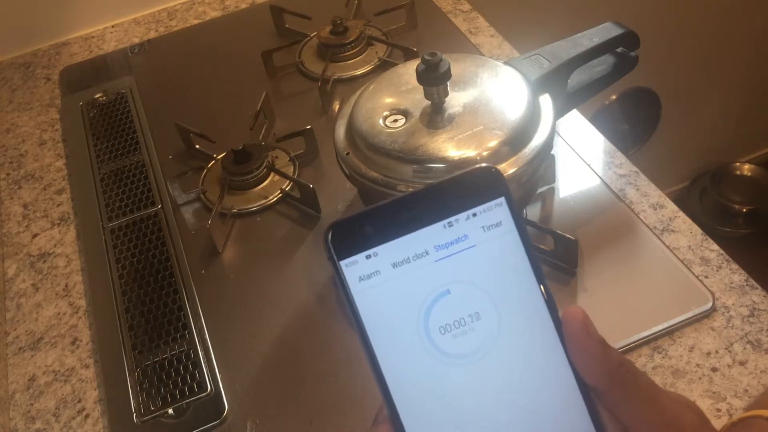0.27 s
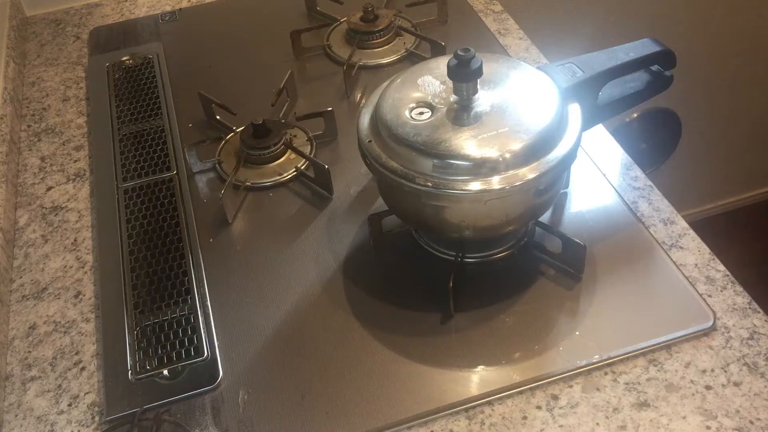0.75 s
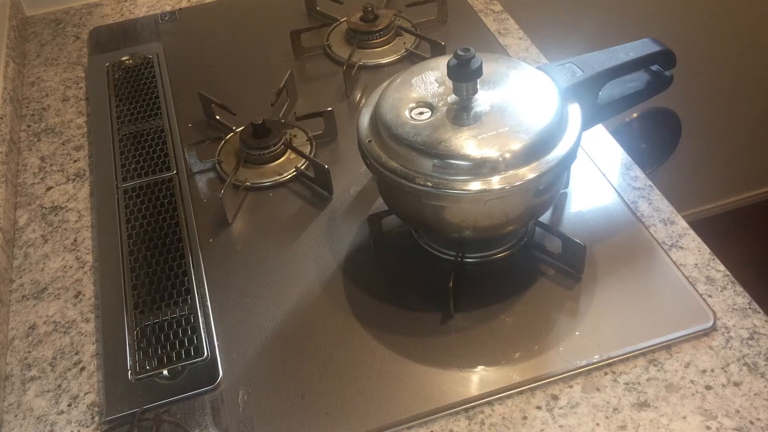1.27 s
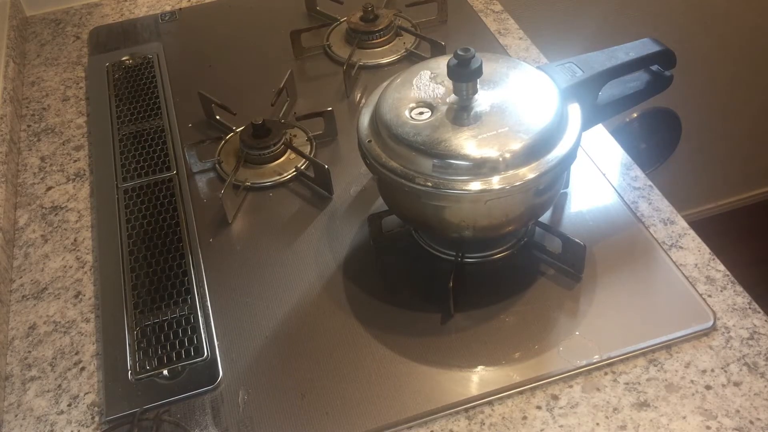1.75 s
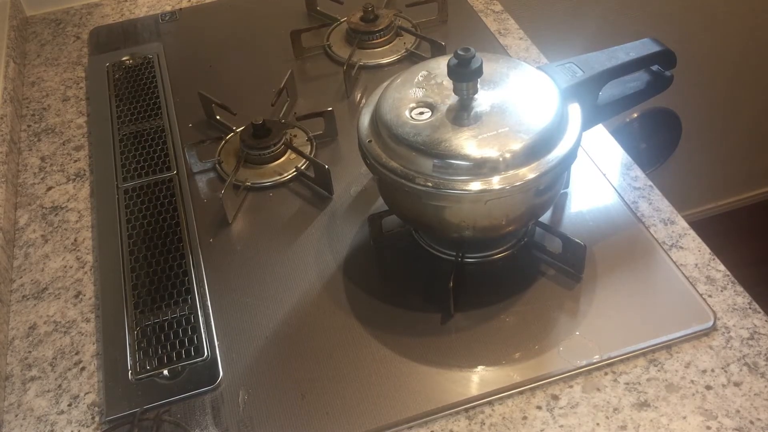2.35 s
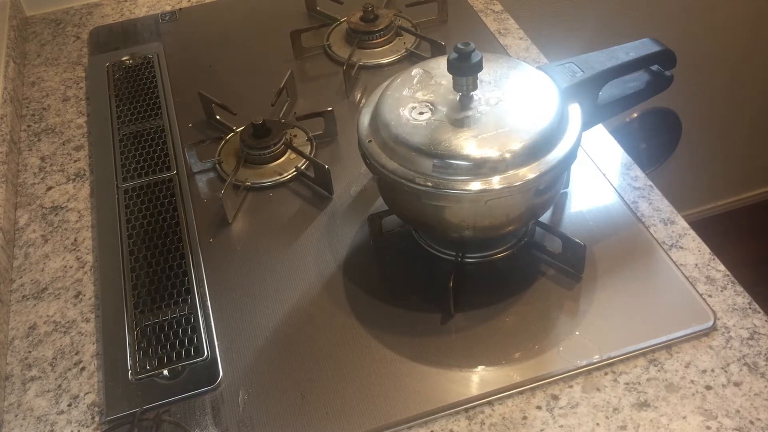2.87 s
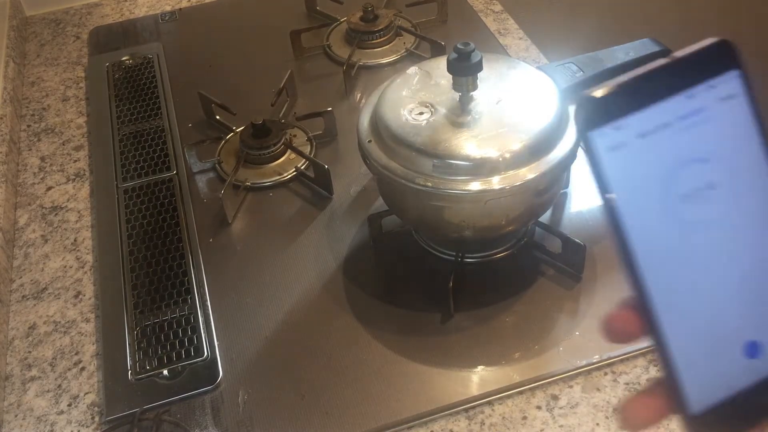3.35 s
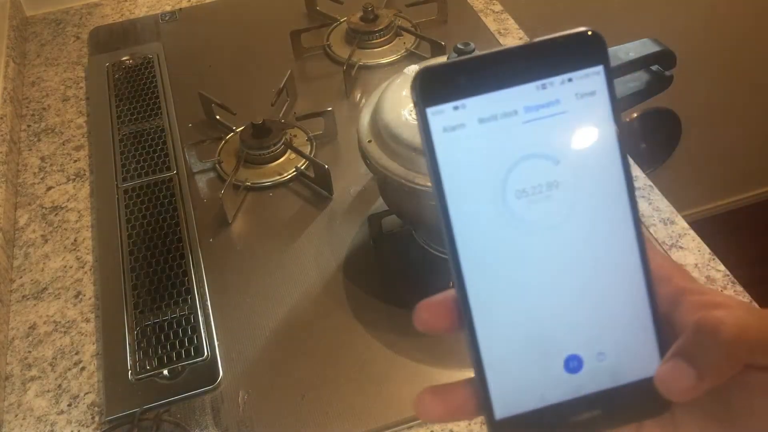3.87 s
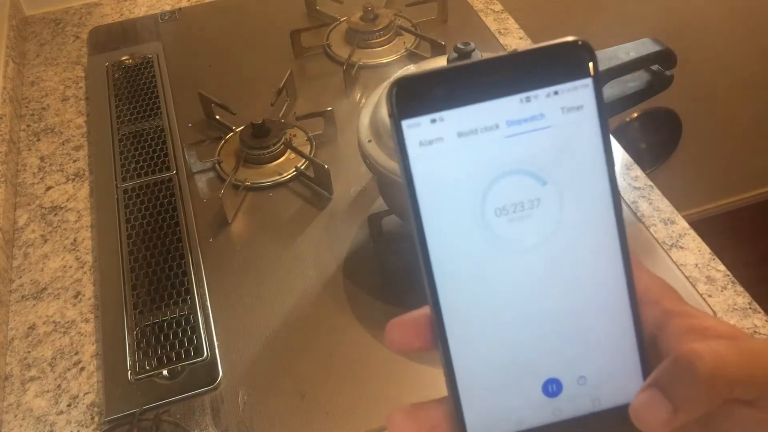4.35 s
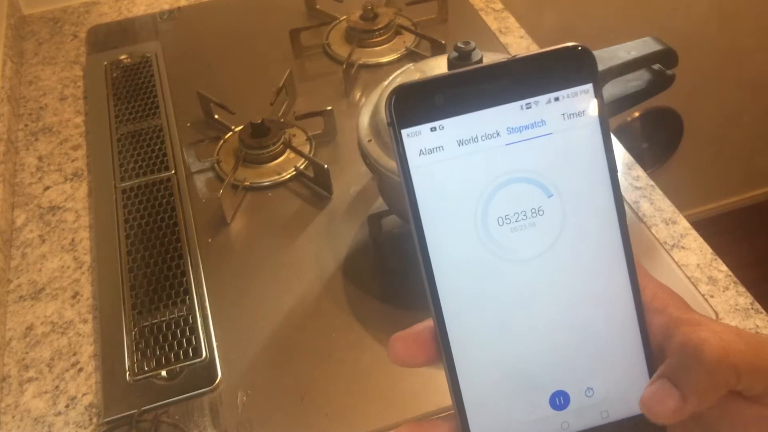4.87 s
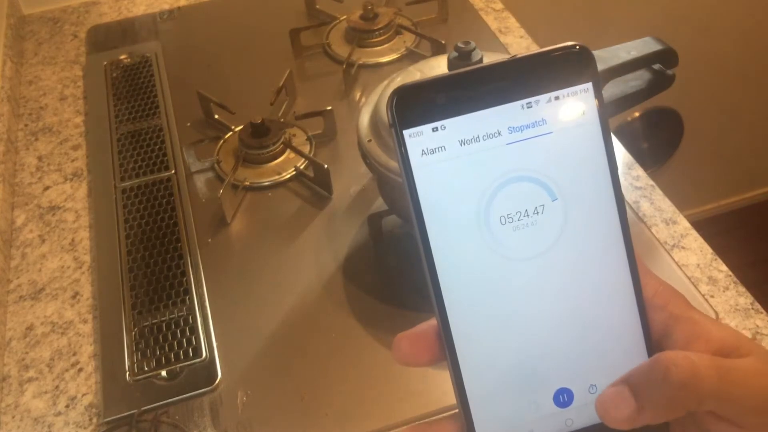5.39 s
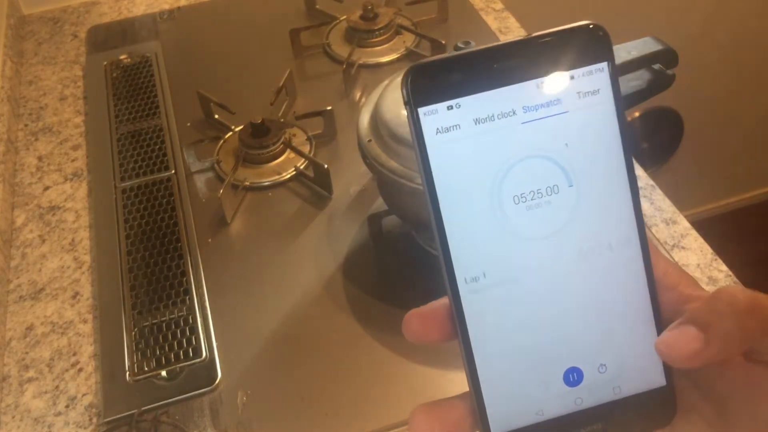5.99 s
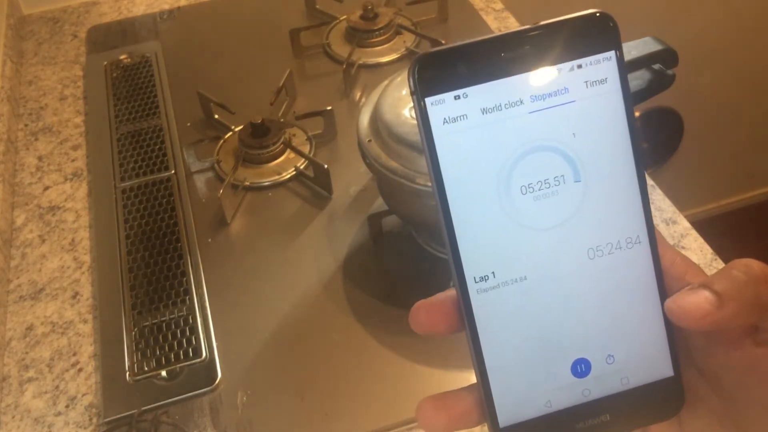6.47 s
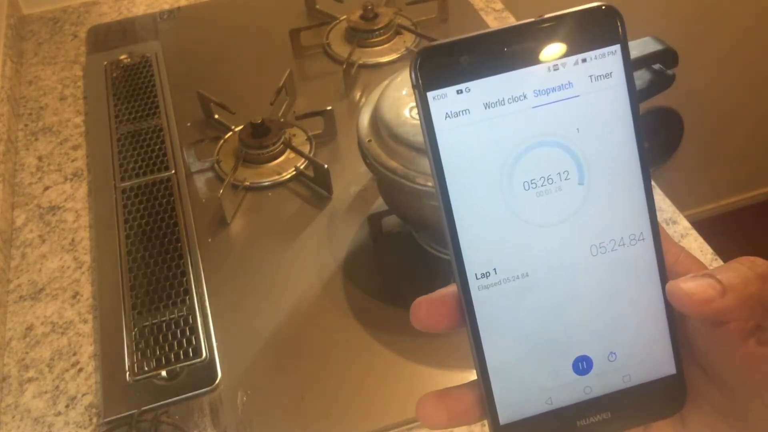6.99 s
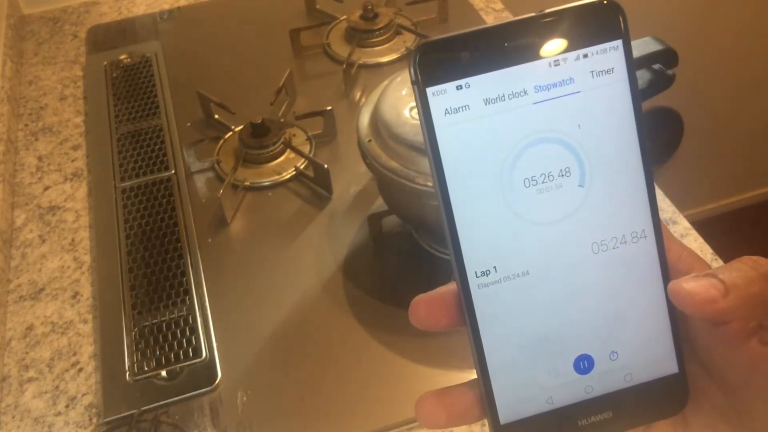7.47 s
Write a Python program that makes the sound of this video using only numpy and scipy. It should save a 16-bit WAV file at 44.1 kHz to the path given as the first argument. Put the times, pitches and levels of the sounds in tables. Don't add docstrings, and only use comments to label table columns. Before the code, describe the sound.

Quiet kitchen hum cuts out briefly, then a low gas flame roars under a thin steam leak before a loud, bright jet hisses steadily.

```python
import sys
import numpy as np
from scipy import signal
from scipy.fft import rfft, irfft, next_fast_len
from scipy.io import wavfile
from scipy.ndimage import uniform_filter1d

SR = 44100
rng = np.random.default_rng(int(sys.argv[2]) if len(sys.argv) > 2 else 0)


def pcm_store(signal):
    levels = np.round(np.clip(np.atleast_2d(signal), -1, 1) * 32767)
    wavfile.write(sys.argv[1], SR, levels.astype(np.int16).T)


def gain_from_db(level_db):
    decades = np.asarray(level_db, float) / 20
    return 10 ** decades


N = 340817
T = np.arange(N) / SR
FFT_SIZE = next_fast_len(N)
HZ = np.fft.rfftfreq(FFT_SIZE, 1 / SR) + 1


def steam():
    # [t/s, level/dB]
    pressure = [(0.53, -30.5), (1.4, -30.5), (1.9, -29), (2.11, -26), (2.2, -14), (2.27, -16), (2.325, -24),
                (2.355, -18.5), (2.385, -10.5), (2.405, -8), (2.43, -14), (2.52, -10.5), (3.6, -11),
                (4.5, -10.5), (5.2, -11.5), (6.3, -11), (7.73, -10.6)]
    # [t/s, share 0-1]
    hand = [
        (0, 0),
        (3.4, 0),
        (4.4, 0.57),
        (5.8, 0.79),
        (7.73, 1),
    ]
    # [f/Hz, level/dB per Hz]
    leak_colour = [(530, -30), (900, -7.5), (1300, -14), (1370, -11.5), (1700, -10.5), (2260, -4),
                   (2460, -11), (2950, -5.5), (3490, -3), (5050, -9), (6270, 0), (7330, -8), (9650, -1.5),
                   (10700, -8), (15800, -8)]
    # [f/Hz, width/Hz, level/dB]
    leak_modes = [(2000, 57, -3), (2986, 93, 0.5), (3500, 130, -6), (5950, 31, -2), (6480, 57, 2),
                  (6700, 30, 4), (7400, 47, -7), (8400, 61, -5), (9560, 650, -4.5), (10900, 180, -12),
                  (11900, 100, -8), (12900, 43, -6), (13400, 78, 2), (13600, 29, -6)]
    # [f/Hz, level/dB per Hz]
    jet_colour = [(200, -29), (400, -25), (800, -21.5), (1040, -14), (1900, -9.5), (2100, -3.5), (2680, -9),
                  (3000, -1), (4200, -3.5), (9700, -0.5), (10500, -2), (11100, -0.5), (12300, -4),
                  (15700, -6)]
    # [f/Hz, width/Hz, level/dB]
    jet_modes = [(2000, 59, -0.5), (2500, 31, -10), (2930, 190, -3), (3457, 88, 3.5), (4680, 400, -0.5),
                 (5100, 85, 3.5), (5700, 89, 4), (5980, 50, 7.5), (6220, 52, -10), (6350, 72, 8),
                 (6940, 56, 7), (7340, 27, -10), (7560, 33, -22), (8830, 130, 3), (10800, 120, -17),
                 (11400, 160, -2), (14100, 190, -2)]
    # [f/Hz, level/dB per Hz]
    shaded_colour = [(200, -28.5), (580, -29), (860, -21), (1040, -12), (1900, -9.5), (2200, -4.5),
                     (2680, -7.5), (2940, -4), (6700, -2.5), (9700, -1), (10500, -5.5), (11100, -3.5),
                     (12300, -5.5), (15700, -8)]
    # [f/Hz, width/Hz, level/dB]
    shaded_modes = [(2306, 62, -1), (2890, 140, -1), (3410, 170, -3.5), (3920, 91, -5), (4600, 130, -2.5),
                    (5110, 62, -10), (5740, 60, -1), (5950, 66, 0.5), (6210, 110, 0), (6780, 60, 2.5),
                    (6935, 61, 2.5), (7475, 40, -3), (7615, 45, -5), (8400, 110, -4), (8950, 61, 2),
                    (11100, 110, -4), (14400, 69, -11), (6480, 50, 0), (15500, 80, -2)]

    level_db = curve(pressure)[0]
    seated_db, afloat_db = -31, -23.5
    afloat = np.clip((level_db - seated_db) / (afloat_db - seated_db), 0, 1)
    shade = np.clip(curve(hand)[0], 0, 1)
    turn = step(5.93, 0.12) - 0.5 * shade

    spit_s, spit_length_s = 2.47, 0.052
    top_db = 5.5 * bump(spit_s, spit_length_s) - 2 * turn
    top_db = top_db + 0.44 * walk(3.98) + 0.97 * walk(14)
    low_db = 0.6 * turn + 0.28 * walk(3.9) - 0.82 * afloat
    loose_db = 9 * bump(2.23, 0.17) + 4.3 * bump(spit_s + 0.05, spit_length_s)

    def ends_db(hz):
        top_share = np.clip((hz - 8500) / 3000, 0, 1)
        low_share = np.clip((2700 - hz) / 900, 0, 1)
        loose_share = np.clip((2500 - hz) / 1100, 0, 1)
        return top_db * top_share + low_db * low_share + loose_db * loose_share

    layers = [(colour(leak_colour, leak_modes, 1), 1 - afloat),
              (colour(jet_colour, jet_modes, -4), afloat * (1 - shade)),
              (colour(shaded_colour, shaded_modes, 0), afloat * shade)]
    hiss = 0
    for gain, share in layers:
        gain = gain / (1 + (150 / HZ) ** 4)
        layer = turbulence(gain, 718, 16500, flicker_db=0.53, rate=14, band_db=ends_db)
        hiss = hiss + np.sqrt(share) * layer
    wobble_db = 0.51 * walk(25)
    return hiss * gain_from_db(level_db + rocking() + 0.36 + wobble_db)


def rocking():
    # [t/s, depth/dB]
    sags = [(3.2, 2), (3.58, 1.4), (3.74, 3), (3.9, 0.7), (4.32, 2), (4.46, 2), (4.93, 2.5), (5.48, 2.5),
            (5.93, 0.8), (6.48, 1.0), (6.58, 1.2), (6.81, 1.5), (7.56, 0.2)]
    # [t/s, height/dB]
    surges = [
        (3.36, 1),
        (4.1, 1.9),
        (4.62, 1.5),
        (6.42, 1),
        (6.69, 1),
        (7.11, 1),
        (7.41, 0.8),
    ]

    def rock(s):
        start_length_s, settle_s = 0.0092, 0.025
        return step(s, start_length_s) * np.exp(-np.clip(T - s, 0, None) / settle_s)

    rise_db = sum(db * rock(s) for s, db in surges)
    fall_db = sum(db * rock(s) for s, db in sags)
    return 1.78 * (rise_db - fall_db)


def echoes(x, count=8):
    t60_s, echo_db = 0.16, -8.5
    t = np.arange(SR // 4) / SR
    out = x
    for k in range(count):
        tail = rng.standard_normal(len(t)) * gain_from_db(-60 * t / t60_s) * (t > 0.001)
        tail = tail / np.linalg.norm(tail)
        here = np.sqrt(np.clip(1 - abs(T / T[-1] * (count - 1) - k), 0, 1))
        out = out + gain_from_db(echo_db) * here * signal.fftconvolve(x, tail)[:N]
    return out


def flame():
    # [f/Hz, level/dB per Hz]
    roar_colour = [(15, -60), (25, -35), (90, -7.5), (139, -7), (253, -7), (332, -12), (468, -11),
                   (585, -16.5), (810, -9), (897, -32), (1500, -25), (1950, -58), (3300, -120)]
    # [f/Hz, width/Hz, level/dB]
    hob_modes = [(183, 21, -7.5), (477, 30, -5), (816, 30, -4)]
    # [t/s, height/dB, length/s]
    note_swells = [(0.66, 6.5, .1), (0.95, 5, .07), (1.24, 5, .05), (1.65, 11.5, 0.16), (2.02, 9, 0.11),
                   (2.32, 8, 0.14), (3.15, 5, .15), (4.0, 7, .1), (4.65, 5, .1), (5.8, 5, .25),
                   (6.7, 0, .1)]

    def duck(fall_s):
        return 1 - np.exp(-np.clip(T - 2.46, 0, None) / fall_s)

    creep_db = -2 * bump(5.2, 1.3)
    roar_db = -35 - 13.5 * duck(0.12) + creep_db + 0.5 * walk(7)
    roar = turbulence(colour(roar_colour, hob_modes, -0.5), 39.4, 1300, flicker_db=2.06, rate=9)

    swell_db = sum(db * bump(s, length_s) for s, db, length_s in note_swells)
    drone_db = -44 + swell_db - 11.5 * duck(0.03) + walk(5)
    note_hz, width_hz = 105, 21
    resonance = 1 / (1 + (2 * (HZ - note_hz) / width_hz) ** 2)
    drone = irfft(rfft(rng.standard_normal(N), FFT_SIZE) * resonance)[:N]
    return roar * gain_from_db(roar_db) + drone / drone.std() * gain_from_db(drone_db)


def kitchen():
    # [t/s, depth/dB]
    lulls = [
        (0.076, 9),
        (0.19, 4),
    ]
    # [f/Hz, level/dB per Hz]
    room_colour = [(18, -58), (30, -34), (88, -15), (127, -16), (161, -3.5), (238, -6), (286, -12.5),
                   (343, -15.5), (435, -23), (496, -16.5), (611, -26), (794, -26.5), (15800, -55)]
    # [f/Hz, width/Hz, level/dB]
    room_modes = [(178, 72, -10), (620, 130, -10.5), (1900, 750, -28.5)]
    hum_db = 1.5 - sum(db * bump(s, 0.03) for s, db in lulls)
    room = turbulence(colour(room_colour, room_modes, -5.5), 53, 8000, flicker_db=0.5, rate=9.9,
                      band_db=lambda hz: hum_db * (hz < 450))
    return room * gain_from_db(-40)


def splits(mid):
    # [t/s, centre f/Hz]
    moments = [(0.665, 11100), (0.688, 11700), (1.408, 8300), (1.408, 12400), (1.431, 11400), (1.478, 5500),
               (1.478, 7000), (1.478, 12500), (1.896, 13400), (2.918, 9000), (2.918, 11200), (3.103, 7000),
               (3.103, 14100), (3.498, 10740), (3.498, 15100), (4.473, 15200), (4.566, 14400),
               (4.705, 10900), (4.705, 13400), (4.775, 11600), (5.077, 13000), (5.286, 14100),
               (5.797, 10500), (5.797, 14400), (5.983, 13300), (6.633, 7700), (6.633, 13400),
               (6.958, 11200), (7.028, 7300), (7.028, 9200)]
    width_hz, size = 1800, 2048
    side = np.zeros(N)
    hz = np.fft.rfftfreq(size, 1 / SR)
    for s, centre_hz in moments:
        start = int(s * SR) - size // 2
        earlier = rfft(mid[start - size:start])
        band = irfft(earlier * (abs(hz - centre_hz) < width_hz / 2))
        side[start:start + size] += band * np.hanning(size) ** 2
    return side * gain_from_db(-1)


def turbulence(gain, lo_hz, hi_hz, flicker_db, rate, band_db=lambda hz: 0):
    spectrum = gain * rfft(rng.standard_normal(N), FFT_SIZE)
    centres = np.arange(np.log2(lo_hz), np.log2(hi_hz), 0.5)
    out = 0
    for c in centres:
        distance = abs(np.clip(np.log2(HZ), centres[0], centres[-1]) - c)
        band = irfft(spectrum * np.clip(1 - 2 * distance, 0, 1), FFT_SIZE)[:N]
        out = out + band * gain_from_db(flicker_db * walk(rate) + band_db(2 ** c))
    return out / np.sqrt(np.mean(gain ** 2))


def colour(points, modes, modes_db):
    hz, db = np.transpose(points)
    power = gain_from_db(np.interp(np.log(HZ), np.log(hz), db)) ** 2
    for f, width, top_db in modes:
        peak = 1 / (1 + (2 * (HZ - f) / width) ** 2) ** 2
        power = power + gain_from_db(top_db + modes_db) ** 2 * peak
    return np.sqrt(power)


def walk(rate):
    k = int(SR / rate)
    w = np.repeat(rng.standard_normal(N // k + 1), k)
    w = uniform_filter1d(uniform_filter1d(w, k), k)[:N]
    return w / w.std()


def curve(table):
    s, *columns = np.transpose(table)
    return [np.interp(T, s, c) for c in columns]


def bump(s, length_s):
    return np.exp(-((T - s) / length_s) ** 2)


def step(s, length_s):
    return 0.5 + 0.5 * np.tanh((T - s) / length_s)


def scene():
    silence_start_s, silence_end_s = 0.4773, 0.5252
    cooker = echoes(steam()) + flame()
    mid = kitchen() * (T < silence_start_s) + cooker * (T > silence_end_s)
    return np.array([mid, mid])


def band_limit(x):
    return signal.sosfilt(signal.butter(12, 15920, fs=SR, output="sos"), x)


def record(dry):
    mid = np.clip(dry[0], -0.92, 0.92)
    top_cut = signal.ellip(10, 0.1, 13, 15740, fs=SR, output="sos")
    mid = signal.sosfiltfilt(top_cut, mid)
    side = splits(mid)
    mix = np.array([mid + side, mid - side])
    return band_limit(mix)


dry = scene()
out = record(dry)
pcm_store(out)
```